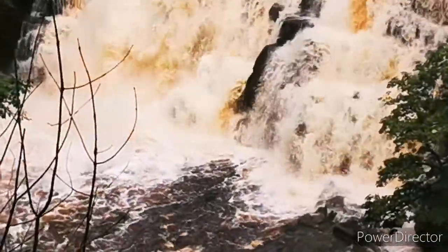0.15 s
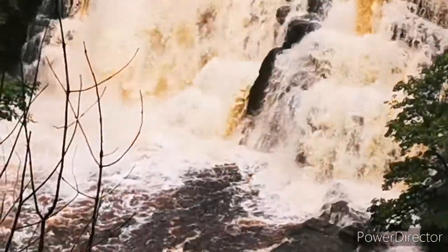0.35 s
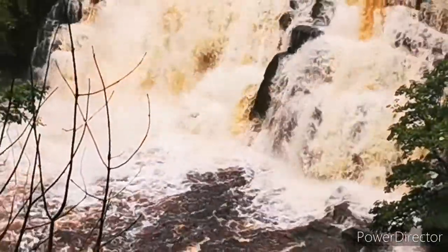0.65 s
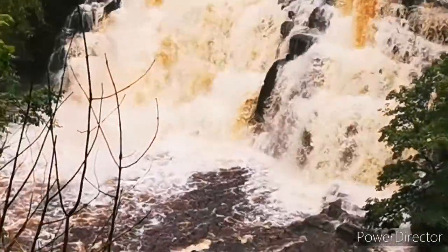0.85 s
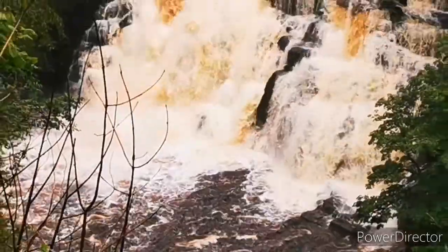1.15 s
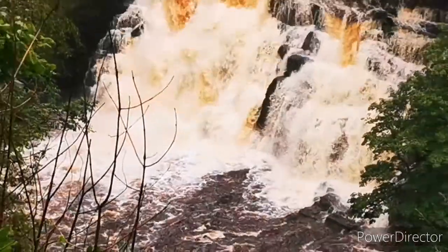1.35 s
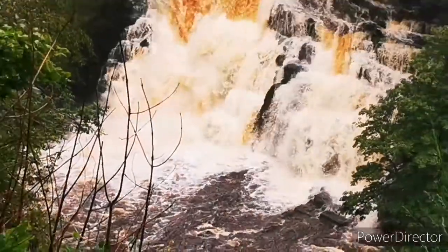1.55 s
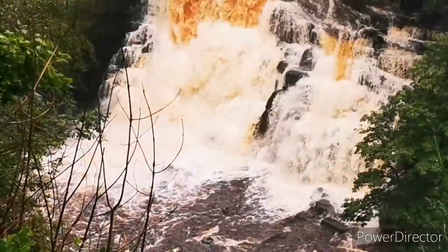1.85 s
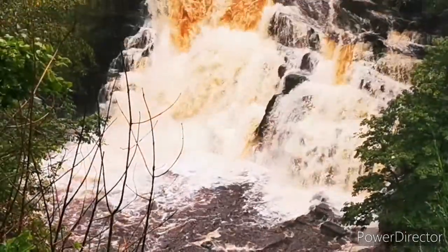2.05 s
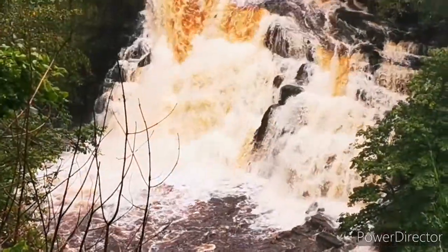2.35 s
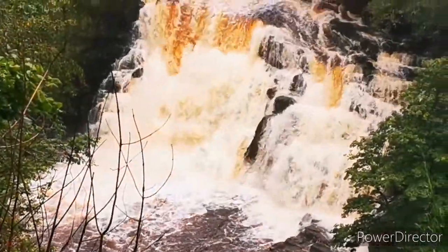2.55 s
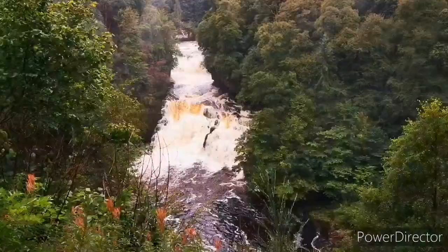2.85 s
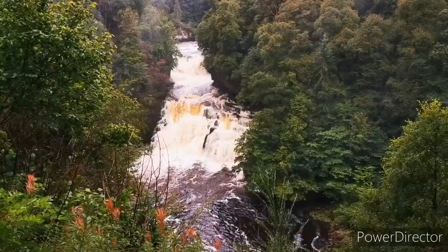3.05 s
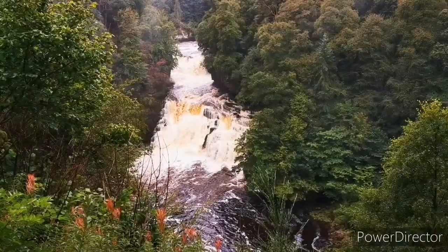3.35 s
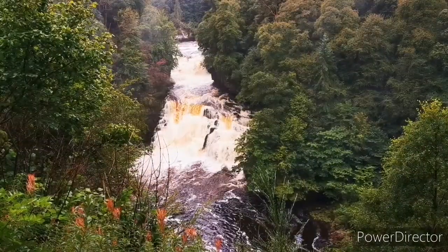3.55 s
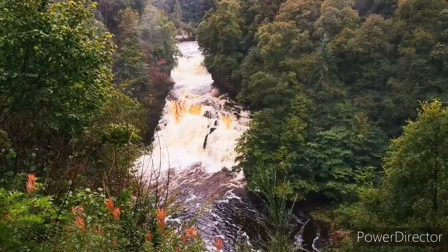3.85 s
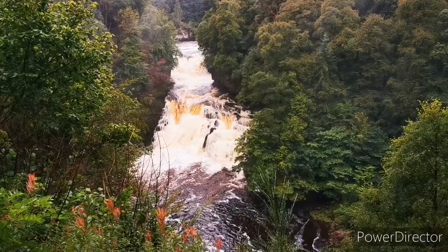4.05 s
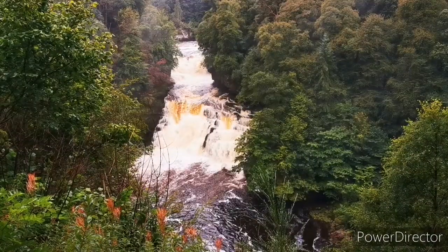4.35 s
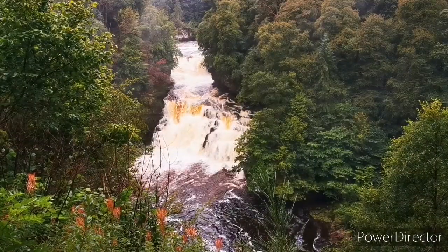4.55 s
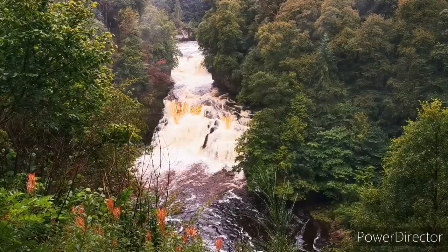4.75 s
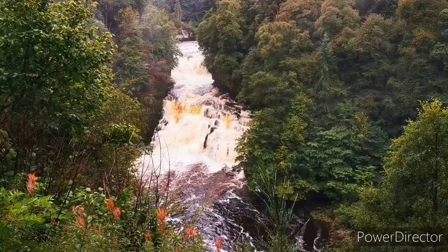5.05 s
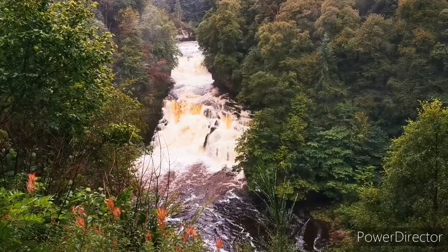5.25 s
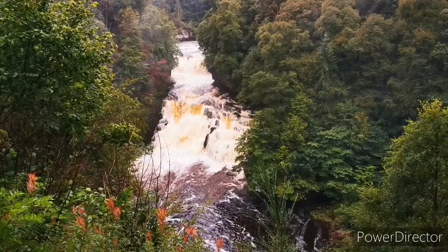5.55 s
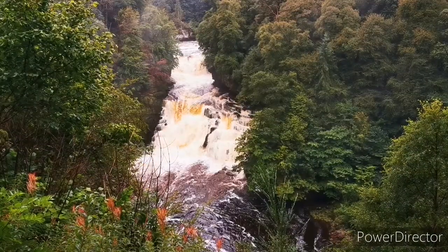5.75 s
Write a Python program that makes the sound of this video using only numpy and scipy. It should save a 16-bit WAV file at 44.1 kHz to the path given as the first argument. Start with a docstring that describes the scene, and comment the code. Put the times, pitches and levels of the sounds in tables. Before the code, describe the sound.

Constant heavy roar of white water with low rumble and soft spray hiss, cut hard to silence briefly, then resuming nearly unchanged.

```python
"""A river in flood plunges over a far waterfall: a steady wash of rumble, roar and spray hiss from countless bubbles,
made of fluttering noise and short ringing chirps. It is heard through the two microphone ports of a hand-held phone,
in two shots with a silent gap between. The direct sound also bounces off the ground and off the holder's body; the
gorge and trees scatter the rest, as separate noise at each port. The grip on the right port differs between the shots.
"""
import sys
import numpy as np
from scipy import signal
from scipy.fft import rfft, irfft, next_fast_len
from scipy.io import wavfile
from scipy.ndimage import uniform_filter1d

SR = 44100
rng = np.random.default_rng(int(sys.argv[2]) if len(sys.argv) > 2 else 0)


def put_to_file(sound):
    """Save the sound as 16-bit audio at rate SR, in the file named by the first command-line argument."""
    columns = np.atleast_2d(sound).T  # one column per channel
    safe = np.clip(columns, -1, 1)
    whole_steps = np.round(safe * 32767)
    wavfile.write(sys.argv[1], SR, whole_steps.astype(np.int16))


N = 260631

# when each shot sounds: (start [s], end [s])
SHOT_TIMES = [(0, 2.8738), (3.1414, 5.92)]
# steady rms level of both ports averaged, a row per shot: (rumble [dB], roar [dB], hiss [dB])
LAYER_LEVELS = [(-34, -35.5, -44.5), (-33, -37, -44.5)]
# spectrum of the far falls, before each layer is set to its level: (frequency [Hz], relative level [dB])
WATER_SPECTRUM = [(8, -32.5), (22, -5), (40, 6.5), (80, 1.5), (128, 2.5), (200, 0.5), (310, 0), (400, 0),
                  (470, -8), (530, -14), (610, -11.5), (720, -13), (1000, -13.5), (1300, -16),
                  (2500, -23.5), (5000, -23), (8000, -31), (13400, -47.5), (13900, -57.5), (15000, -57),
                  (15700, -69.5)]
# power arriving directly, alike at both ports: (frequency [Hz], first shot [share 0-1], second shot [share 0-1])
DIRECT_SHARE = [(60, 1, 0.96), (250, 0.94, 0.96), (406, 0.99, 0.98), (510, 0.87, 0.66), (770, 0.77, 0.78),
                (1314, 0.2, 0.26), (1700, 0.55, 0.41), (2184, 0.51, 0.44), (2700, 0.22, 0.42),
                (3060, 0.23, 0.55), (3470, 0.12, 0.5), (4070, 0.34, 0.4), (4420, .2, 0.48),
                (5050, 0.4, 0.35), (5600, 0.18, 0.45), (6100, .4, 0.26), (9000, .1, .15)]
# ground bounce, then body bounce, a list per shot:
# (left delay [ms], right delay [ms], level against the straight path [dB], treble corner [Hz])
BOUNCE_PATHS = [
    [(7.54, 7.8, -8.5, 220), (1.125, 1.31, -6.5, 2100)],
    [(7.4, 8.07, -9.5, 380), (1.24, 1.27, -7, 11000)],
]
# how much later the straight path reaches the right port, one per shot: (lag [ms])
RIGHT_PORT_LAG = [0.003, 0.022]
# humps and dips of each port: (centre [Hz], width [Hz], first shot [dB], second shot [dB])
LEFT_PORT_COLOUR = [(29.8, 670, 0, -2.5), (580, 155, 1, -1.5), (770, 200, 1.2, -0.5), (1306, 430, -0.5, 0),
                    (1460, 160, -0.4, -5), (2020, 200, 0.5, 0), (2270, 240, 3.5, 2), (2780, 350, 3.5, 2.5),
                    (3450, 500, 1.1, 1.1), (4500, 490, 2.5, 1), (5600, 800, -1, -1.5), (6950, 670, 3, 2.5),
                    (9090, 930, 6.5, 6.5), (10900, 880, 2.5, 3.5)]
RIGHT_PORT_COLOUR = [(30, 470, -4, -6.5), (320, 70, 1.2, 1), (490, 61, -1.7, -1.2), (560, 150, 2, -1),
                     (640, 90, -0.1, -0.3), (740, 110, 0.7, 0.9), (814, 810, 1, 2), (1170, 170, 0.2, -1.7),
                     (1550, 1600, 5.5, 0.5), (1990, 170, -1, -1.5), (2220, 600, 11, 6), (2700, 660, 0, 2),
                     (2970, 280, 4.5, 2), (4050, 210, 3, -0.5), (4860, 300, -3.5, .3), (5690, 700, 5, 2),
                     (6850, 680, 8, 6), (10620, 740, 4.5, 4.5), (11660, 4800, 6.5, 5.5)]

RUMBLE_TOP_HZ, HISS_FOOT_HZ = 450, 3000  # crossovers of rumble, roar and hiss
BAND_LIMIT_HZ = 15714


def amp(db):
    """Gain of a level in dB."""
    return 10 ** (np.asarray(db) / 20)


def unit(x):
    """x at rms 1."""
    return x / np.sqrt(np.mean(x ** 2) + 1e-20)


def along(points, hz):
    """Value at hz between (frequency, value) points, on a log frequency axis."""
    f, v = np.transpose(points)
    return np.interp(np.log(hz + 1), np.log(f + 1), v)


def filtered(x, response):
    """x shaped by a gain (real or complex) that depends on frequency."""
    m = next_fast_len(x.shape[-1] + 8192)
    spectrum = rfft(x, m) * response(np.fft.rfftfreq(m, 1 / SR))
    return irfft(spectrum, m)[..., :x.shape[-1]]


def churn(size, channels, wide_db, patch_db):
    """White water noise whose level flutters, over all pitches at once and in patches of time and pitch."""
    noise = signal.stft(rng.standard_normal((channels, size)), nperseg=512)[2]
    wide = uniform_filter1d(rng.standard_normal(noise.shape[2]), size=4)
    patch = rng.standard_normal(noise.shape[1:])
    patch = uniform_filter1d(patch, size=5, axis=0)
    patch = uniform_filter1d(patch, size=5, axis=1)
    flutter_db = wide_db * unit(wide) + patch_db * unit(patch)
    return unit(signal.istft(noise * amp(flutter_db), nperseg=512)[1][:, :size])


def bubbles(size, count, cycles, spread_db):
    """Air pockets of all sizes ring briefly and rise in pitch; on average equal power per Hz."""
    when, where, big = rng.random((count, 3)).T
    hz = 90 * (6000 / 90) ** where
    gain = hz * amp(-spread_db * np.log(1 - big))  # a few bubbles stand out
    out = np.zeros(size + 2048)
    # low bubbles need long rings, high ones short
    for length, pick in ((2048, hz < 700), (256, hz >= 700)):
        turns = hz[pick, None] * np.arange(length) / SR
        swell = turns * np.exp(-2 * turns / cycles)
        ring = np.sin(2 * np.pi * turns * (1 + 0.031 * turns)) * swell
        at = (when[pick, None] * size).astype(int) + np.arange(length)
        out += np.bincount(at.ravel(), (gain[pick, None] * ring).ravel(), size + 2048)
    return unit(out[:size])


def paths(shot, hz):
    """The straight path plus its duller, later bounces off ground and body, per port, scaled for mean power 1."""
    def delayed(left_ms, right_ms):
        return np.exp(-2j * np.pi * hz * np.array([[left_ms], [right_ms]]) / 1000)

    ways, power = delayed(0, RIGHT_PORT_LAG[shot]), 1
    for left_ms, right_ms, db, top_hz in BOUNCE_PATHS[shot]:
        gain = amp(db) / (1 + (hz / top_hz) ** 2)
        ways = ways * (1 + gain * delayed(left_ms, right_ms))  # the second bounce also echoes the first
        power = power * (1 + gain ** 2)
    return ways / np.sqrt(power)


def port(modes, shot, hz):
    """Gain of a microphone port: bell-shaped humps and dips, summed in dB."""
    return amp(sum(row[2 + shot] * np.exp(-.5 * ((hz - row[0]) / row[1] * 2) ** 2) for row in modes))


def layers(air, shot):
    """Rumble, roar and hiss split by smooth crossovers, each set to its own steady level and summed."""
    def low(hz):
        return 1 / (1 + (hz / RUMBLE_TOP_HZ) ** 6)

    def high(hz):
        return 1 / (1 + (HISS_FOOT_HZ / (hz + 1)) ** 6)

    def middle(hz):
        return 1 - low(hz) - high(hz)

    out = 0
    for weight, db in zip((low, middle, high), LAYER_LEVELS[shot]):
        layer = filtered(air, weight)
        out = out + layer / np.std(layer.mean(axis=0)) * amp(db)
    return out


def falls(shot, size):
    """One shot of the falls: direct and scattered water noise mixed by power share, then coloured at both ports."""
    def share(hz):
        return np.clip(along([(row[0], row[1 + shot]) for row in DIRECT_SHARE], hz), 0, 1)

    def colour(hz):
        ports = [port(LEFT_PORT_COLOUR, shot, hz), port(RIGHT_PORT_COLOUR, shot, hz)]
        return amp(along(WATER_SPECTRUM, hz)) * ports

    foam = bubbles(size, count=7000, cycles=2.5, spread_db=1.5)
    direct = unit(churn(size, channels=1, wide_db=0.1, patch_db=1.0) + amp(-9.5) * foam)
    scattered = churn(size, channels=2, wide_db=0.13, patch_db=1.0)
    air = filtered(direct, lambda hz: np.sqrt(share(hz)) * paths(shot, hz))
    air = air + filtered(scattered, lambda hz: np.sqrt(1 - share(hz)))
    return layers(filtered(air, colour), shot)


def scene():
    """Both shots of the falls, cut hard, with silence between."""
    out = np.zeros((2, N))
    for shot, (start, end) in enumerate(SHOT_TIMES):
        a, b = round(start * SR), min(round(end * SR), N)
        out[:, a:b] = falls(shot, b - a)
    return out


def record(dry):
    """Nothing is kept above the band limit."""
    return filtered(dry, lambda hz: hz < BAND_LIMIT_HZ)


dry = scene()
out = record(dry)
put_to_file(out)
```